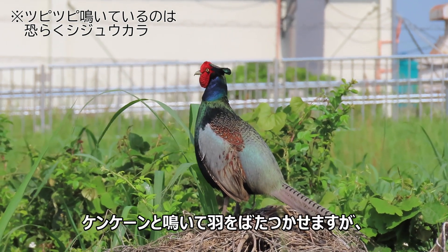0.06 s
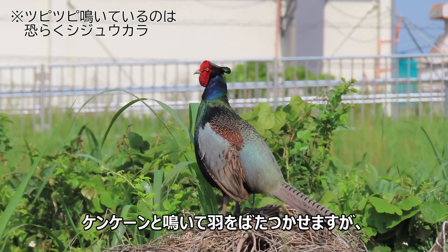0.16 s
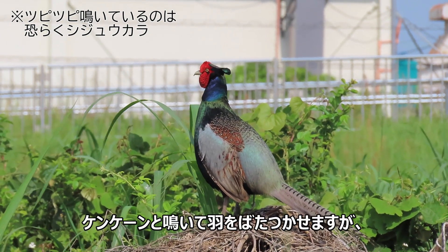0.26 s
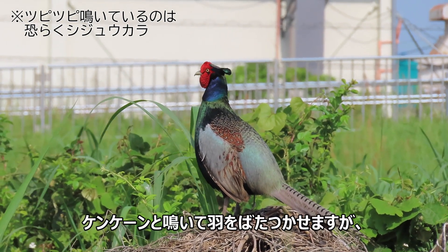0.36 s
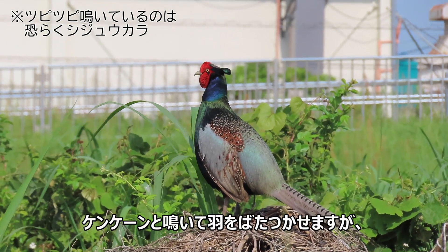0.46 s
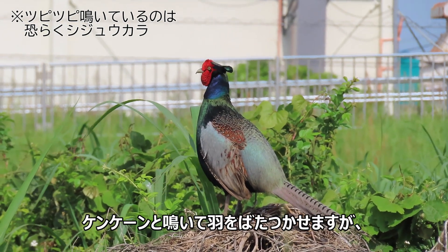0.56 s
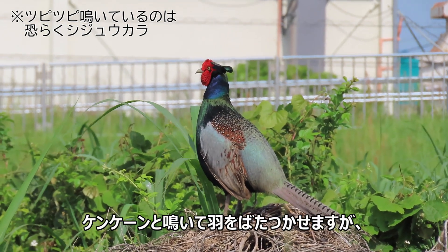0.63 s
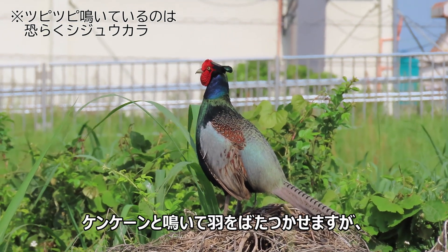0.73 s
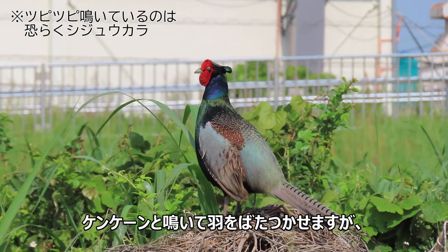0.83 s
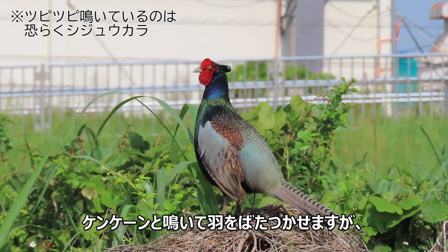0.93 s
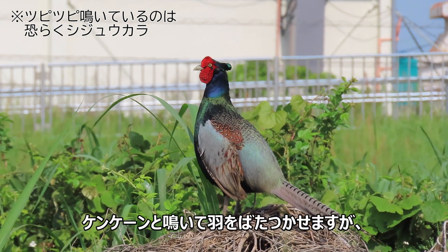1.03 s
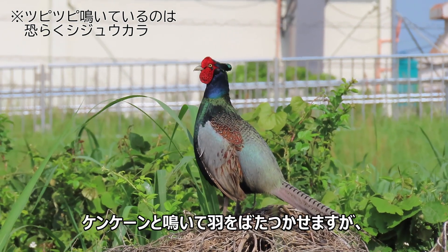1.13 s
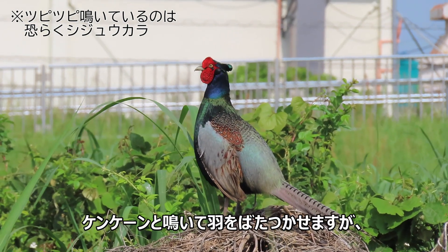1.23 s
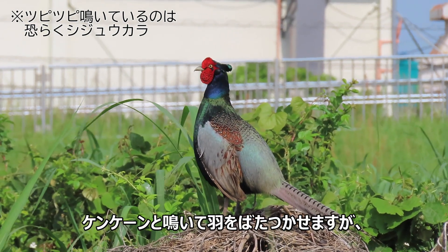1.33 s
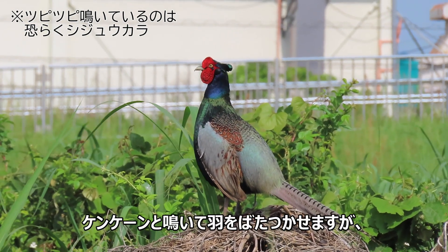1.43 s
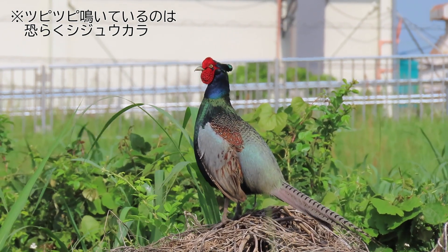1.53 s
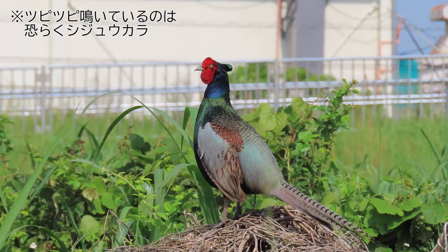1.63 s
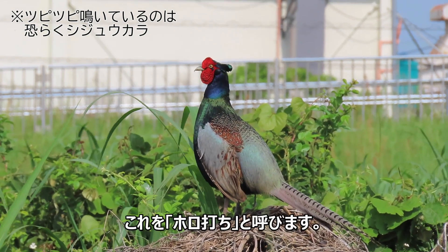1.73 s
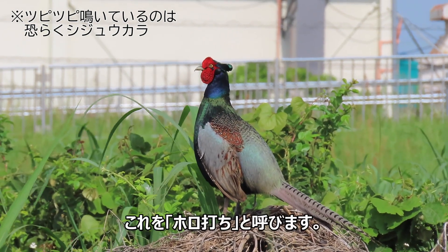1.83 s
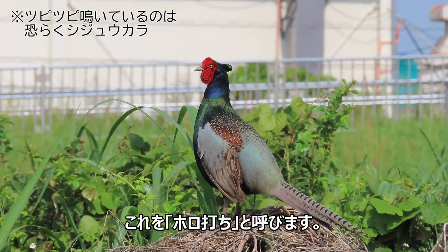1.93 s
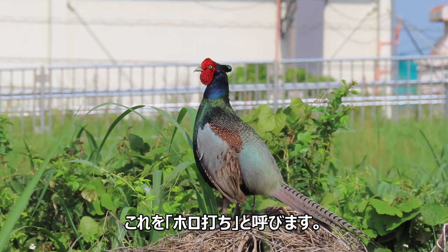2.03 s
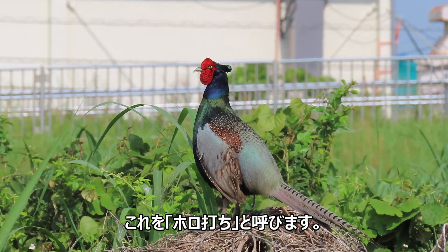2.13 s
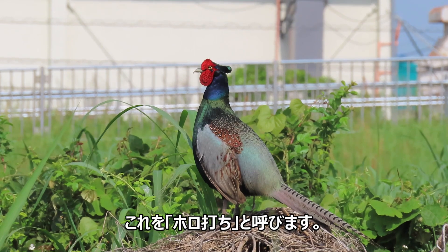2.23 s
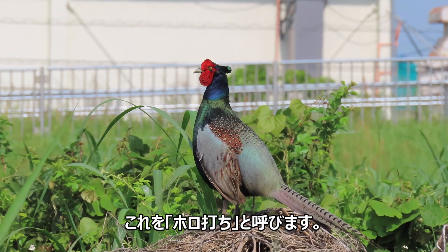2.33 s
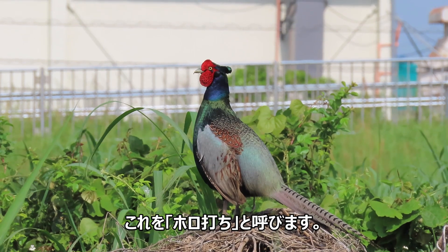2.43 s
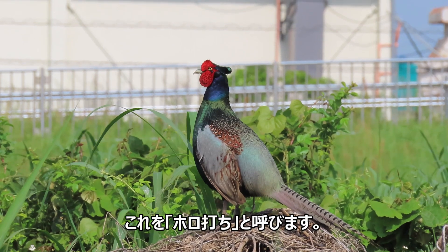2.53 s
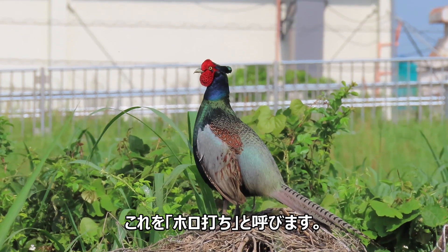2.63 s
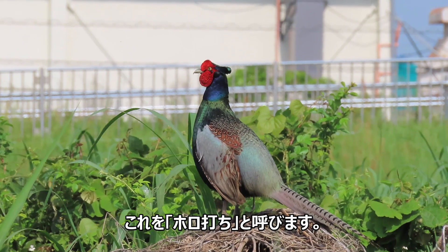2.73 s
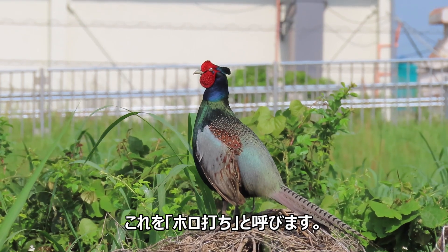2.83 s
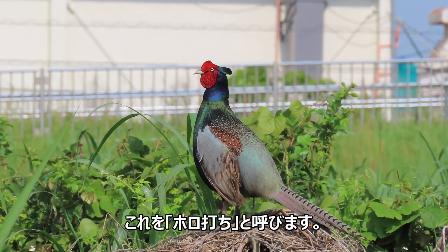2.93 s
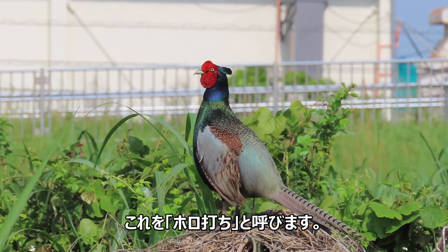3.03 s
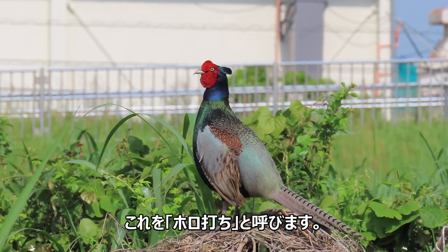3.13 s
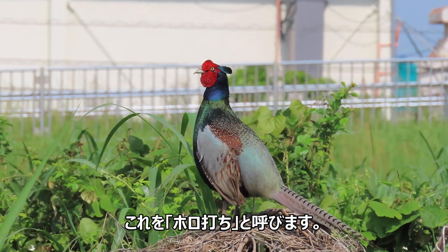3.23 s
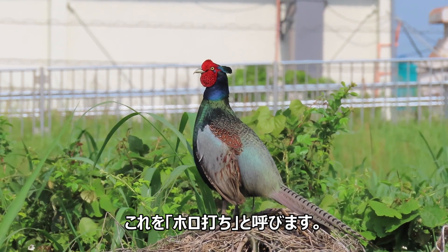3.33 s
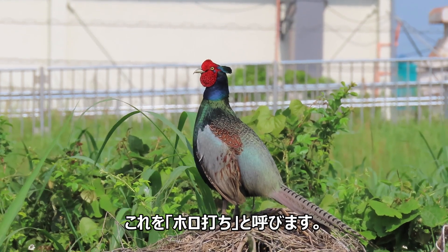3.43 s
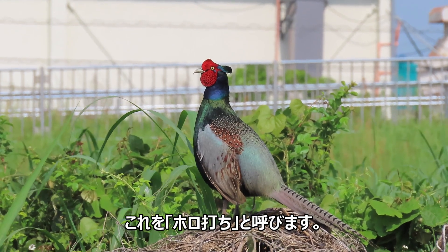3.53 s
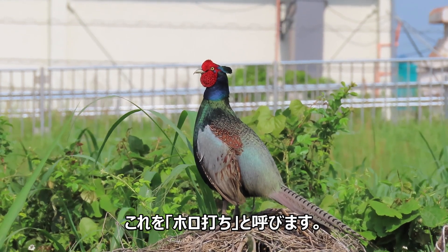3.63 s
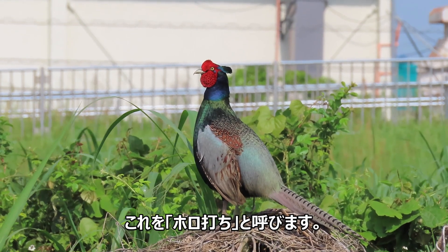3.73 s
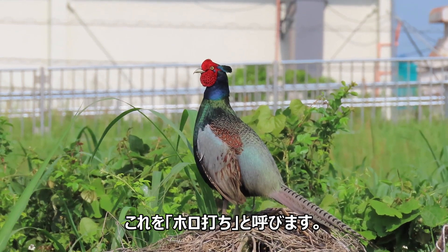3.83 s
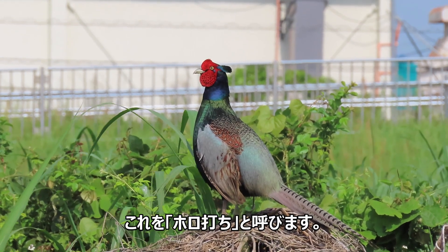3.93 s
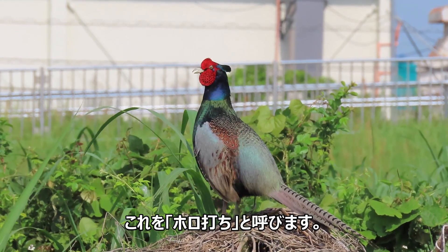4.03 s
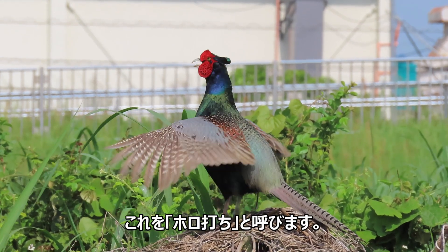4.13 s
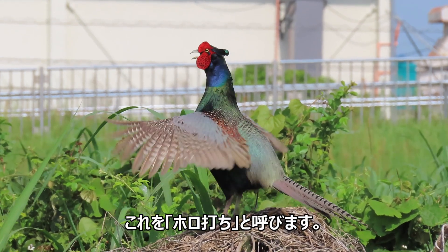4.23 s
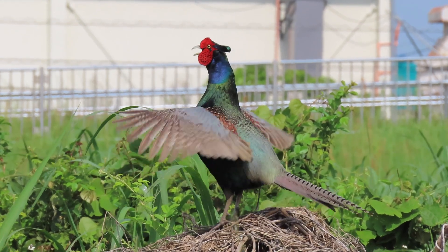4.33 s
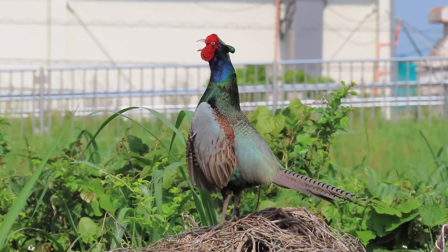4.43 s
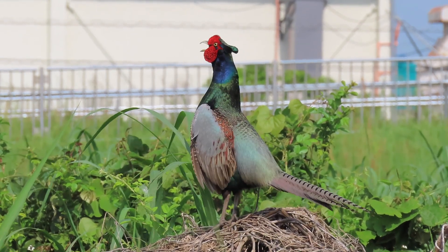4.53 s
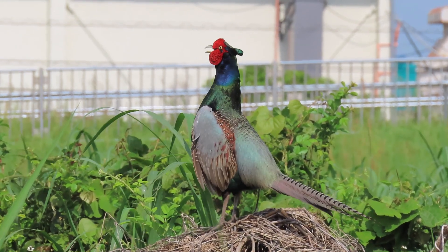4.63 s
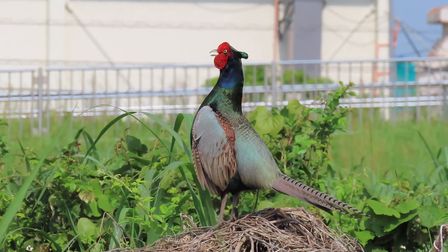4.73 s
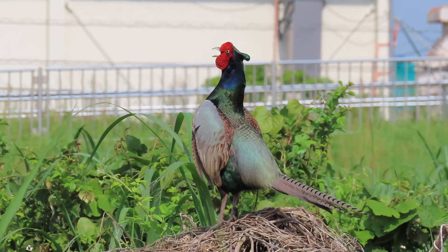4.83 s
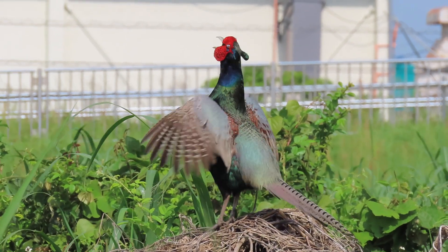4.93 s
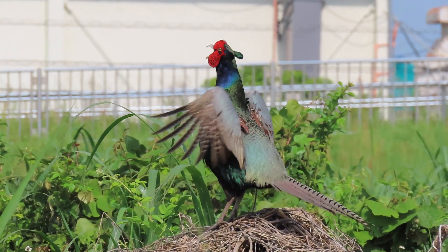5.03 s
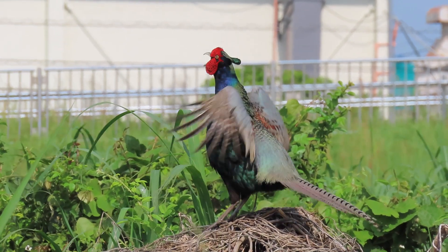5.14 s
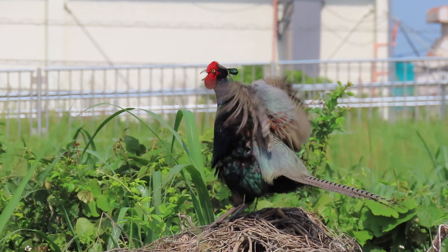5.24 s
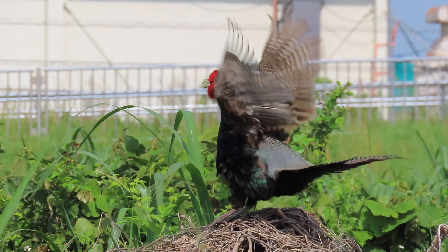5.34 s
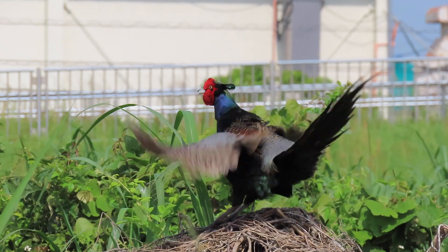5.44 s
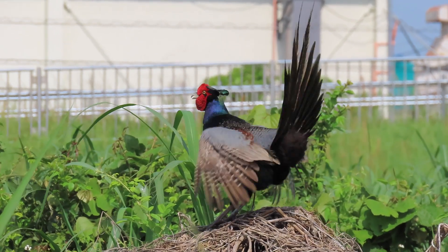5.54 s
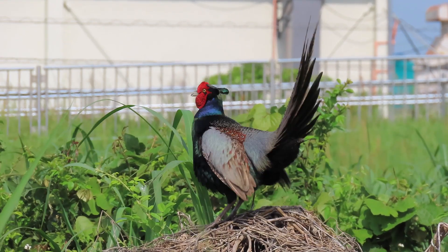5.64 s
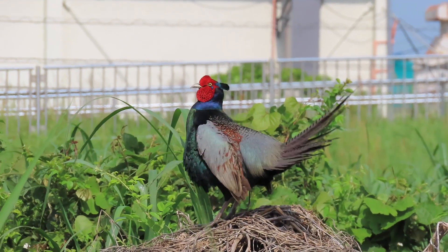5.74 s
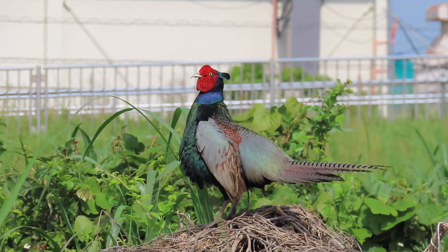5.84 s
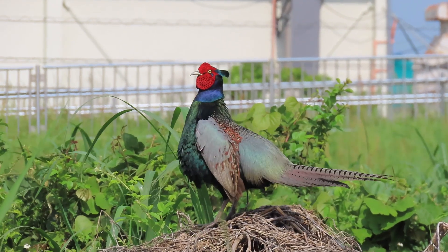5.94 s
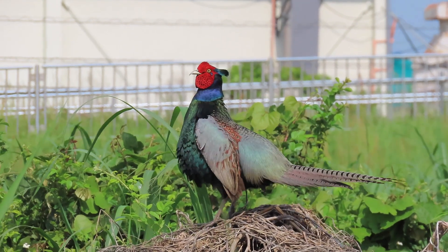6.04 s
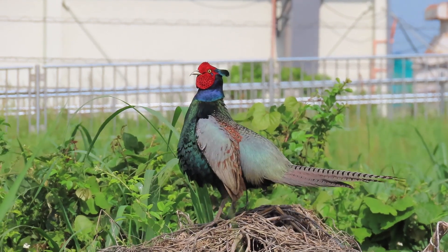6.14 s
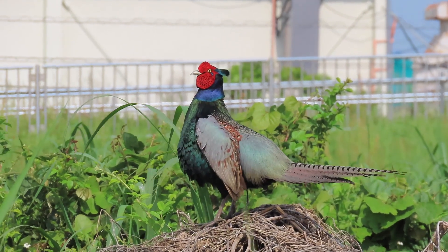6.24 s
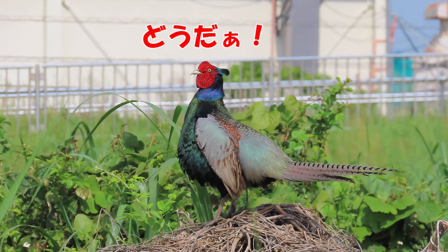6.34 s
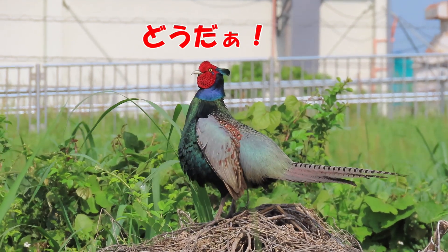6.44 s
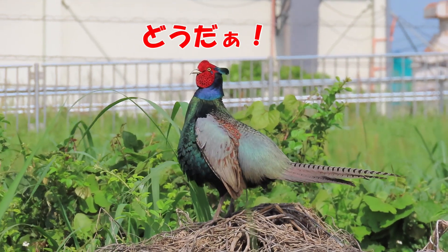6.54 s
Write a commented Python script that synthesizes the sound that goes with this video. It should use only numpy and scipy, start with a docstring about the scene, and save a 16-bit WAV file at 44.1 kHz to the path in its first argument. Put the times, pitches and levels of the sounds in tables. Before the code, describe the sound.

Open field with faint traffic rumble; bright songbird notes alternate until a pheasant blasts two raspy crows, followed by a quick soft wing flutter.

```python
"""A field with a straw heap, from which a cock pheasant crows twice, harshly, and whirrs his wings at the end.
His voice is a tone over a rasp of overtones on half its pitch; the wings are puffs and snaps of noise. Before
that a songbird to the left alternates a high whip and a rising whistle, both gliding sines. Faint sliding
chirps come from far off at the start and the end. Ground, fence and buildings throw calls back over a distant
traffic rumble, with a soft steady hiss above it: shaped noise."""
import sys
import numpy as np
from scipy import signal
from scipy.fft import rfft, irfft, next_fast_len
from scipy.io import wavfile

SR = 44100
rng = np.random.default_rng(int(sys.argv[2]) if len(sys.argv) > 2 else 0)


def unload_wav(signal):
    """Save mono or channel-first audio to the path in sys.argv[1] as 16-bit WAV at rate SR, clipped to [-1, 1]."""
    wavfile.write(
        sys.argv[1],
        SR,
        np.round(np.clip(np.atleast_2d(signal).T, -1, 1) * 32767).astype(np.int16),
    )


N = 289737
TIME = np.arange(N) / SR


def from_db(db):
    """Decibels to gain."""
    return 10 ** (np.asarray(db) / 20)


def rms_one(x):
    """Scale to unit power."""
    return x / np.sqrt(np.mean(x ** 2) + 1e-20)


def at_hz(points, hz):
    """Gain of a (Hz, dB) table at the given frequencies, straight over log frequency."""
    f, db = np.transpose(points)
    return from_db(np.interp(np.log(hz), np.log(f), db))


def colour(x, points):
    """Filter a sound by a (Hz, dB) table."""
    size = next_fast_len(x.shape[-1])
    hz = np.maximum(np.arange(size // 2 + 1) * SR / size, 1)
    return irfft(rfft(x, size) * at_hz(points, hz), size)[..., :x.shape[-1]]


def wander(size, hz):
    """Random motion, mostly slower than the given rate, with an rms of 1."""
    lowpass = signal.butter(2, min(hz, SR / 3), fs=SR, output="sos")
    run_in = SR // 4  # lets the filter settle
    motion = signal.sosfilt(lowpass, rng.standard_normal(size + run_in))
    return rms_one(motion[run_in:])


def turn(hz):
    """Phase of an oscillator with a moving pitch."""
    return 2 * np.pi * np.cumsum(hz) / SR


def tone(phase, db):
    """A sine of the given rms level."""
    return np.sqrt(2) * from_db(db) * np.sin(phase)


def along(curve, t):
    """Value of a (s, value) curve at times t."""
    return np.interp(t, *np.transpose(curve))


def envelope(t, attack_s, length_s, release_s):
    """Attack, hold and release, all within the length."""
    attack = np.clip(t / attack_s, 0, 1)
    release = np.clip((length_s - t) / release_s, 0, 1)
    return attack * release


def arch(t, length_s):
    """Rises from 0 to 1 and falls back over the length."""
    return np.sin(np.pi * np.clip(t / length_s, 0, 1))


def add(track, s, sound):
    """Mix a sound into a track at time s."""
    i = max(round(s * SR), 0)
    track[i:i + len(sound)] += sound[:N - i]


def late(x, s):
    """Delay by any fraction of a sample, by turning the phase of the spectrum."""
    size = next_fast_len(N + SR // 2)
    hz = np.arange(size // 2 + 1) * SR / size
    return irfft(rfft(x, size) * np.exp(-2j * np.pi * hz * s), size)[:N]


def place(x, pan_db, left_lag_ms):
    """Set a source in stereo by level and arrival time; positive pan is louder on the left."""
    left = late(x, left_lag_ms / 1000) * from_db(pan_db / 2)
    right = x * from_db(-pan_db / 2)
    return np.array([left, right])


def field(x, near_db, near_t60, far_db, far_t60):
    """Weeds and fences scatter a short tail, distant buildings a long faint one."""
    # colour of the scattered sound: (f/Hz, level/dB)
    scatter_colour = [(300, 12), (1100, 5.5), (2200, 20.5), (4500, 12), (7000, 13), (12000, -10)]
    t = TIME[:int(1.5 * SR)]
    build_up = 1 - np.exp(-(t / 0.0028) ** 2)
    response = 0
    for db, t60 in ((near_db, near_t60), (far_db, far_t60)):
        noise = colour(rng.standard_normal((2, len(t))), scatter_colour)
        tail = noise * from_db(-60 * t / t60) * build_up
        response = response + from_db(db) * rms_one(tail) / np.sqrt(len(t))
    return signal.fftconvolve(x[None], response, axes=1)[:, :N]


def air():
    """Distant traffic rumble, common to both sides, swells a little; the hiss above it is steady and diffuse."""
    # spectrum common to both sides: (f/Hz, level/dB per Hz)
    mid_colour = [(12, -43), (20, -8.5), (44, -2.5), (112, -2.5), (207, -10.5), (298, -7.5), (333, -11),
                  (631, -12), (1130, -15), (1500, -19.5), (2210, -22.5), (3260, -26), (4190, -26.5),
                  (6360, -30), (15500, -33.5)]
    # spectrum opposed between the sides: (f/Hz, level/dB per Hz)
    side_colour = [(12, -52), (20, -21), (54, -0.5), (80, -24), (112, -3.5), (352, -1), (382, -2),
                   (491, -1), (906, -3), (2920, -14.5), (4310, -17), (6190, -21), (15500, -23.5)]
    mid_db, side_db = -48, -53
    swell_db, swell_rate_hz, swell_top_hz = 1.3, 3.3, 250
    mid = from_db(mid_db) * rms_one(colour(rng.standard_normal(N), mid_colour))
    rumble = signal.sosfilt(signal.butter(1, swell_top_hz, fs=SR, output="sos"), mid)
    swell = from_db(swell_db * wander(N, swell_rate_hz))
    mid = mid + rumble * (swell - 1)
    side = from_db(side_db) * rms_one(colour(rng.standard_normal(N), side_colour))
    return np.array([mid + side, mid - side])


def chirp(length_s, first_hz, last_hz, db, waver):
    """A short sliding sine that swells and fades, with a slight tremble."""
    dip = 0.029  # share by which the pitch is lower at both ends
    t = TIME[:int(length_s * SR)]
    bow = arch(t, length_s)
    pitch = np.geomspace(first_hz, last_hz, len(t)) * (1 - dip * (1 - bow))
    phase = turn(pitch * (1 + waver * wander(len(t), 330)))
    return np.sqrt(bow) * tone(phase, db)


def far_birds():
    """Distance leaves these notes faint and smeared, with much of them heard as scatter."""
    # far notes: (t/s, length/s, first pitch f/Hz, last pitch f/Hz, level/dB before distance)
    far_notes = [(0, .06, 1950, 1950, -49.5), (.185, .085, 1850, 2010, -51.5),
                 (.305, .065, 2600, 1600, -51.5), (.503, .047, 1444, 3200, -50.5),
                 (5.908, .12, 4180, 3960, -62), (6.168, 0.068, 4580, 4050, -60)]
    direct_db = -6
    notes = np.zeros(N)
    for s, *note in far_notes:
        add(notes, s, chirp(*note, waver=0.0087))
    scattered = field(notes, near_db=-10.5, near_t60=0.23, far_db=-22, far_t60=1.1)
    return from_db(direct_db) * notes + scattered


def song_throat(hz):
    """Gain of the songbird's throat: a pass band with steep skirts."""
    low_hz, high_hz = 3646, 4900
    low_slope, high_slope = 10.5, 24
    low_skirt = np.hypot(1, (low_hz / hz) ** low_slope)
    high_skirt = np.hypot(1, (hz / high_hz) ** high_slope)
    return 1 / (low_skirt * high_skirt)


def whip(ratio):
    """A pure note that leaps upward cleanly, then creeps higher and trembles more and more."""
    # pitches here are before the call's own ratio
    goal_hz, leap_hz, leap_s, creep_hz_per_s = 5643, 1906, .0125, 10500
    attack_s, length_s, release_s = .015, .115, .072
    waver = .03  # share of the pitch, reached at the end
    t = TIME[:int(length_s * SR)]
    pitch = goal_hz - leap_hz * np.exp(-t / leap_s) + creep_hz_per_s * t
    tremble = waver * t / length_s * wander(len(t), 290)
    phase = turn(ratio * pitch * (1 + tremble))
    return envelope(t, attack_s, length_s, release_s) ** 1.5 * tone(phase, -27.5)


def whistle(ratio):
    """As the pitch climbs, the throat's resonance passes from the octave to the fundamental."""
    # slow climb, quick climb and drop: (t/s from the start, pitch f/Hz before the ratio)
    whistle_curve = [(0, 2086), (.11, 2759), (.165, 3480), (.226, 4020), (.25, 3146)]
    attack_s, release_s = .042, .014
    waver, onset_waver, settle_s = .007, .03, .02  # wavers as shares of the pitch
    fundamental_db, octave_db, third_db, third_top_hz = -20.7, -33, -53, 6700
    length_s = whistle_curve[-1][0]
    t = TIME[:int(length_s * SR)]
    pitch = along(whistle_curve, t)
    # the pitch is unsteady at first
    unsteady = waver + onset_waver * np.exp(-t / settle_s)
    phase = turn(ratio * pitch * (1 + unsteady * wander(len(t), 130)))
    fundamental = song_throat(pitch) * tone(phase, fundamental_db)
    octave = song_throat(2 * pitch) * tone(2 * phase, octave_db)
    third = tone(3 * phase, third_db) / (1 + (3 * pitch / third_top_hz) ** 20)
    return envelope(t, attack_s, length_s, release_s) * (fundamental + octave + third)


def songbird():
    """Whip and whistle alternate; a ground echo beats against each glide, and leaves scatter the whip most."""
    # whistled calls: (t/s, relative level/dB, pitch ratio)
    whistle_calls = [(1.518, -4.5, 0.99), (2.081, -4, 1.0), (2.639, -4, 1.0), (3.244, -4, 0.99),
                     (3.836, -4.5, 0.99)]
    # whipped calls: (t/s, relative level/dB, pitch ratio)
    whip_calls = [(1.267, -6.5, 1.02), (1.840, -.5, 0.99), (2.406, 0, 0.97), (2.974, -1, 0.98),
                  (3.584, -1, 0.98), (4.189, -1.5, 0.97)]
    # chirps that end each whip:
    # (t/s after its start, length/s, first f/Hz and last f/Hz before the ratio, level/dB before the mix)
    whip_tips = [(.075, .068, 8200, 8750, -47), (.1, .062, 7750, 7300, -43.5)]
    whistle_db, whip_db = -1.5, -4.5
    ground_s, ground_db = .0057, -3.5
    whistles, whips = np.zeros((2, N))
    for s, db, ratio in whistle_calls:
        add(whistles, s, from_db(db) * whistle(ratio))
    for s, db, ratio in whip_calls:
        add(whips, s, from_db(db) * whip(ratio))
        for after_s, length_s, first_hz, last_hz, tip_db in whip_tips:
            tip = chirp(length_s, ratio * first_hz, ratio * last_hz, tip_db, waver=0.022)
            add(whips, s + after_s, tip)
    song = from_db(whistle_db) * whistles + from_db(whip_db) * whips
    direct = song + from_db(ground_db) * late(song, ground_s)
    # the scatter is fed ahead of the two mix levels
    scattered = (field(whistles, near_db=-9.5, near_t60=0.17, far_db=-28.0, far_t60=0.86)
                 + field(whips, near_db=-9, near_t60=0.23, far_db=-22.5, far_t60=0.77))
    return place(direct, pan_db=5.5, left_lag_ms=0.02) + scattered * from_db([[1.2], [-1.2]])


def catching(t):
    """Extra roughness where the pheasant's voice catches briefly."""
    # catches: (t/s, extra roughness 0-1)
    catch_list = [(5.08, .18), (5.118, .27), (5.155, .27), (5.246, .27), (5.33, .22)]
    width_s = .011
    return sum(extra * np.exp(-((t - s) / width_s) ** 2) for s, extra in catch_list)


def roughness(t, age, push):
    """A note starts harsh and settles; it breaks up again at each catch and when the push ends."""
    steady, onset, settle_s, in_croak = .295, .62, .02, .18  # roughness 0-1
    rough = steady + onset * np.exp(-age / settle_s) + in_croak * (1 - push) + catching(t)
    return np.clip(rough, 0, 1)


def crow(note, pitch_curve):
    """The syrinx swings strong-weak: a loud tone with a rasping stack of overtones on half its pitch."""
    # the second side of the syrinx joins at its own pitch:
    # (t/s, length/s, top pitch f/Hz, level/dB at its start, lift of the rasp/dB)
    second_side = [(5.06, .062, 872, -26, 5), (5.342, .076, 968, -21.5, 1.5)]
    # throat, as it shapes the overtones: (f/Hz, level/dB)
    throat = [(550, -12), (1650, -1), (2230, 0), (2550, -26), (3300, -23), (3900, 2), (4450, -5), (5050, 2),
              (5600, -4), (6300, 0), (7100, -6), (7900, -18), (10400, -21), (13000, -46)]
    # turbulence caught in the windpipe's main resonance: (f/Hz, level/dB)
    growl_colour = [(600, -42.5), (850, -9.5), (1020, 4), (1200, -3), (1500, -35), (2500, -56)]
    start, attack_s, length_s, croak_s, tone_db, rasp_db, clearing_db, gape_hz = note
    age = TIME[:int((length_s + croak_s) * SR)]
    t = start + age

    # one push of air drives tone and rasp, and leaves a weak croak behind
    push_release_s, croak_release_s = .028, .0091
    croak_tone_db, croak_rasp_db = -17.5, -6
    push = envelope(age, attack_s, length_s, push_release_s)
    croak = envelope(age, attack_s, length_s + croak_s, croak_release_s)
    tone_drive = np.maximum(push, from_db(croak_tone_db) * croak)
    rasp_drive = np.maximum(push ** 1.7, from_db(croak_rasp_db) * croak)
    cleared_db = clearing_db * np.minimum(age, length_s)
    catch_dip_db = 9 * catching(t)  # the tone sinks at a catch
    tone_gain = from_db(tone_db + cleared_db - catch_dip_db) * tone_drive
    rasp_gain = from_db(rasp_db - cleared_db) * rasp_drive

    pitch = along(pitch_curve, t)
    rough = roughness(t, age, push)
    # the beak's resonance rises by the gape and is back before the note ends
    beak_hz = 3980 + gape_hz * arch(age, .88 * length_s)
    phase = turn(pitch * (1 + .003 * wander(len(t), 41)))
    # steady stretches are clean; irregularity grows steeply with roughness
    chaos = rough ** 2
    shake = 0.52 * chaos * wander(len(t), 450)

    # the second side pulls on the main voice at their difference in pitch, and mixes into sum tones
    second_attack_s, fade_db_per_s, second_dip = .012, 190, .07
    coupling, mixing_db = 2.4, -12
    second = 0
    for s, span_s, hz, db, screech_db in second_side:
        since = t - s
        bow = arch(since, span_s)
        faded_db = db - fade_db_per_s * np.maximum(since, 0)
        gain = envelope(since, second_attack_s, span_s, croak_release_s) * from_db(faded_db)
        own = turn(hz * (1 - second_dip * (1 - bow))) + shake  # lower at both ends
        sum_tones = sum(at_hz(throat, pitch + k * hz) * tone(phase + k * own, mixing_db)
                        for k in range(1, 5))
        second = second + gain * (tone(own, 0) + sum_tones)
        pull = coupling * (gain / (tone_gain + 1e-9)).clip(0, .2)
        shake = shake + pull * np.sin(phase - own) / 2
        rasp_gain = rasp_gain * from_db(screech_db * bow)

    beak_db, beak_width_hz = 9, 380
    flutter_db, weak_db, dull_db_per_hz = 1.8, -8.0, .0055
    stack = 0
    for k in range(1, 23):
        # each overtone flutters, and swells as the beak's resonance passes over it
        above_beak_hz = k * pitch / 2 - beak_hz
        beak_lift_db = beak_db / (1 + (above_beak_hz / beak_width_hz) ** 2)
        lift_db = beak_lift_db + flutter_db * wander(len(t), 23)
        # in the croak, overtones above the beak's resonance fall away
        dull_db = dull_db_per_hz * (1 - push) * np.maximum(above_beak_hz, 0)
        overtone_gain = from_db(lift_db - dull_db + weak_db * (k % 2))  # odd ones are weaker
        stack = stack + overtone_gain * np.sin(k * (phase / 2 + shake) + rng.uniform(0, 2 * np.pi))

    # turbulence comes in puffs, one a swing
    rush = rng.standard_normal(len(t)) * (1 + np.cos(phase / 2))
    rasp = rms_one(colour(rms_one(stack) + from_db(-7) * chaos * rush, throat))
    growl = from_db(-11) * rough * rms_one(colour(rng.standard_normal(len(t)), growl_colour))
    clear = tone(phase + 2 * 0.13 * shake, 0)
    return tone_gain * (clear + growl) + rasp_gain * rasp + second


def pheasant():
    """Two notes, nearly straight ahead, a quick echo from the fence and a late one from the buildings behind."""
    # crow notes: (t/s, attack/s, length/s, dying croak/s, tone level/dB, rasp level/dB,
    # clearing/dB per s by which the tone grows as the rasp fades, beak gape f/Hz)
    crow_notes = [(4.561, .026, .228, 0.0027, -16.6, -23.5, -0.5, 60),
                  (5.028, .009, .334, .052, -17.2, -21.6, 12, 1200)]
    # pitch curve of each note: (t/s, f/Hz)
    crow_curves = [
        [(4.57, 1068), (4.581, 1011), (4.595, 1080), (4.635, 1106), (4.68, 1109), (4.72, 1090), (4.757, 1094),
         (4.78, 1128)],
        [(5.034, 1045), (5.055, 1115), (5.115, 1154), (5.131, 1107), (5.205, 1128), (5.255, 1121),
         (5.295, 1155), (5.325, 1158), (5.345, 1143)],
    ]
    # colour of the echo from the buildings: (f/Hz, level/dB)
    wall_colour = [(500, -41), (1100, -43.5), (2200, -28), (4100, -30.5), (5200, -43), (9000, -43)]
    fence_s, fence_db, wall_s = .062, -21, .37
    voice = np.zeros(N)
    for note, pitch_curve in zip(crow_notes, crow_curves):
        add(voice, note[0], crow(note, pitch_curve))
    fence_echo = from_db(fence_db) * late(voice, fence_s)
    wall_echo = colour(late(voice, wall_s), wall_colour)
    tail = field(voice, near_db=-16, near_t60=0.37, far_db=-25.5, far_t60=1.35)
    return place(voice + fence_echo + wall_echo, pan_db=-1.2, left_lag_ms=0.035) + tail


def wings():
    """The flapping wings push puffs of air and the flight feathers snap, several times in each of the last flaps."""
    # wing sounds, puffs and snaps, several to each of the last flaps:
    # (t/s, puff level/dB, feather snap level/dB), both levels before the doubling and decay below
    wing_sounds = [(5.36, -61, -59), (5.443, -42.5, -56), (5.529, -39, -68.5), (5.603, -43, -46.5),
                   (5.614, -45, -61), (5.666, -42.5, -42.5), (5.681, -43, -53), (5.696, -53, -60)]
    # colour of the puffs: (f/Hz, level/dB)
    puff_colour = [(120, -1), (300, -9), (550, 0.5), (1000, -1.5), (1800, -10.5), (4000, -18.5),
                   (9000, -29)]
    # colour of the snaps: (f/Hz, level/dB)
    feather_colour = [(500, -25), (1300, -9), (4200, -6), (7000, -42), (14000, -35)]
    rise_s, fall_s, snap_s = .003, .013, .0035
    puff, snap = np.zeros(N), np.zeros(N)
    t = TIME[:SR // 8]
    puff_shape = 2 * (1 - np.exp(-t / rise_s)) * np.exp(-t / fall_s)
    snap_shape = 2 * np.exp(-t / snap_s)
    for s, puff_db, snap_db in wing_sounds:
        add(puff, s - rise_s, from_db(puff_db) * puff_shape)
        add(snap, s, from_db(snap_db) * snap_shape)
    puff_noise, snap_noise = rng.standard_normal((2, N))
    puffs = puff * rms_one(colour(puff_noise, puff_colour))
    snaps = snap * rms_one(colour(snap_noise, feather_colour))
    return place(puffs + snaps, pan_db=-1.5, left_lag_ms=0.038)


def scene():
    """The field with all its birds."""
    return air() + far_birds() + songbird() + pheasant() + wings()


def record(dry):
    """A steep elliptic low-pass cuts the top."""
    cutoff_hz = 15800
    return signal.sosfilt(signal.ellip(12, .1, 80, cutoff_hz, fs=SR, output="sos"), dry)


dry = scene()
out = record(dry)
unload_wav(out)
```